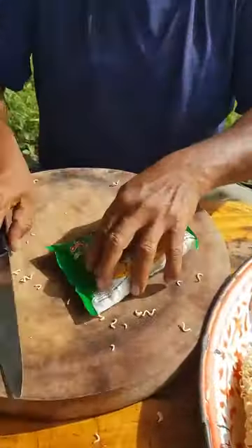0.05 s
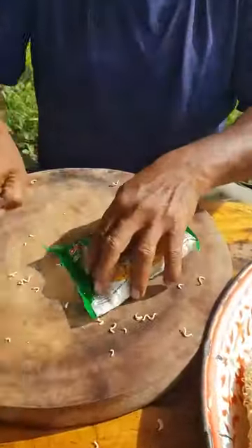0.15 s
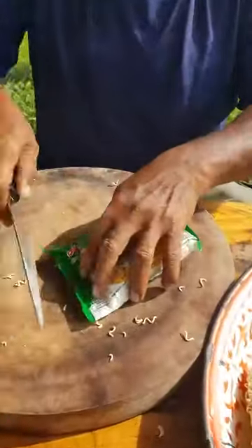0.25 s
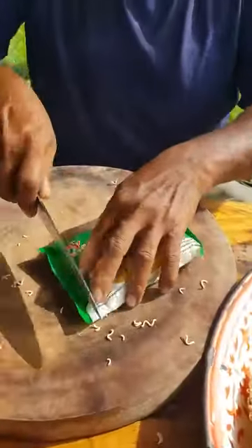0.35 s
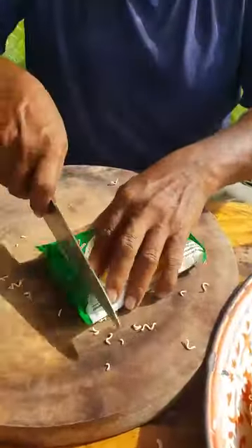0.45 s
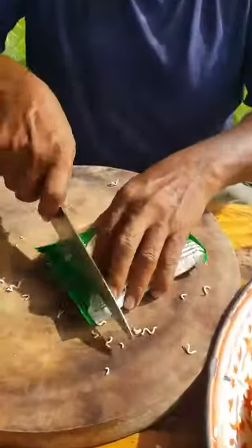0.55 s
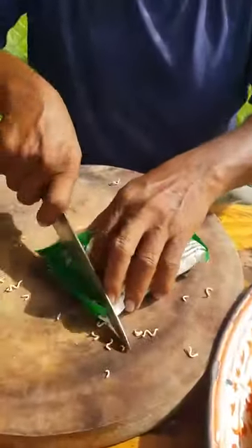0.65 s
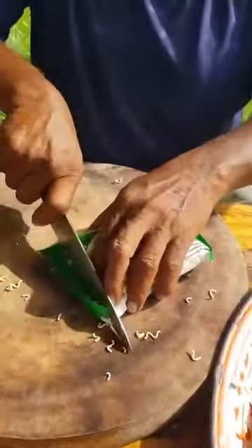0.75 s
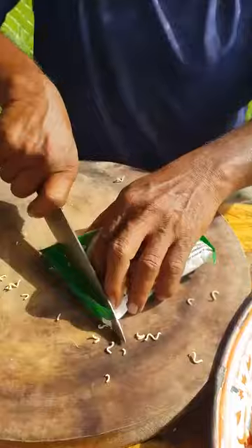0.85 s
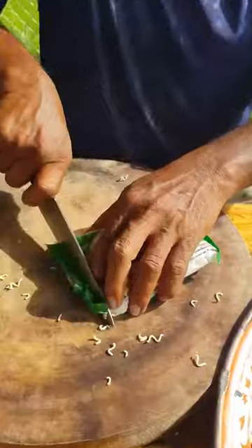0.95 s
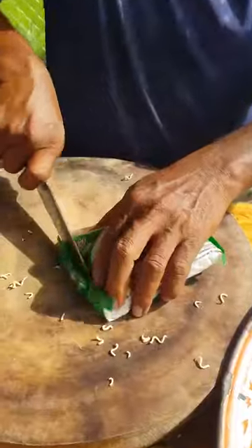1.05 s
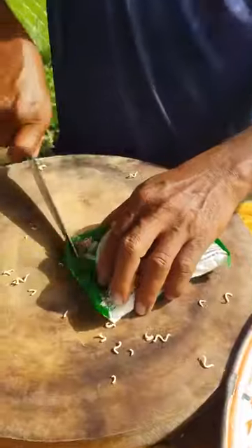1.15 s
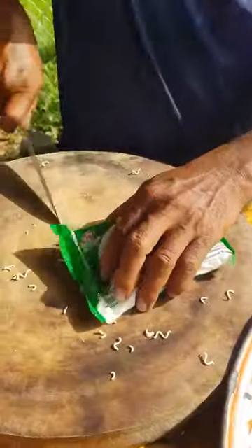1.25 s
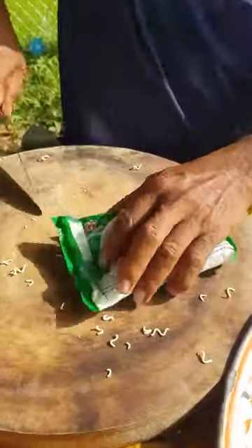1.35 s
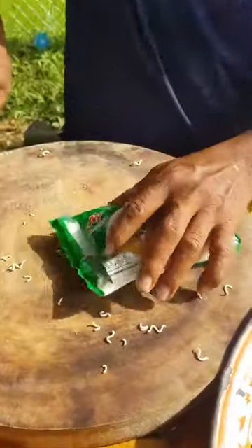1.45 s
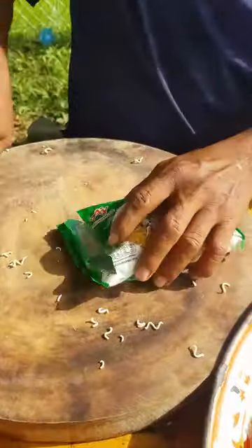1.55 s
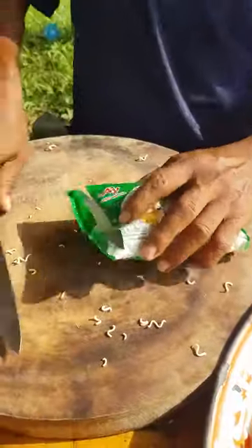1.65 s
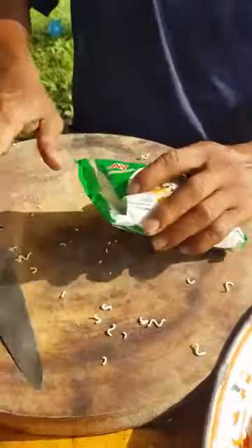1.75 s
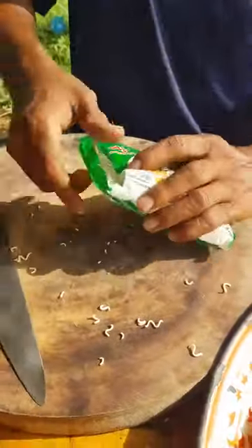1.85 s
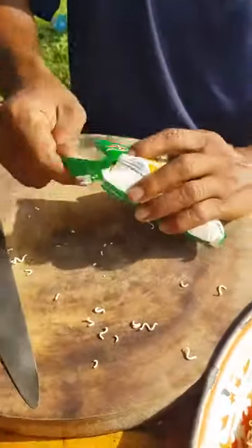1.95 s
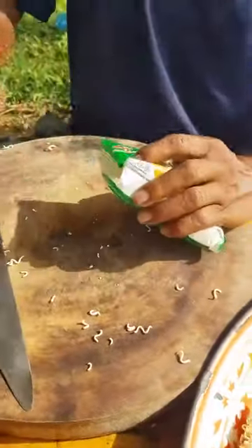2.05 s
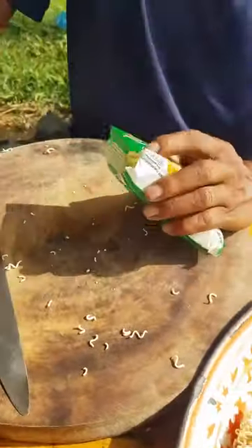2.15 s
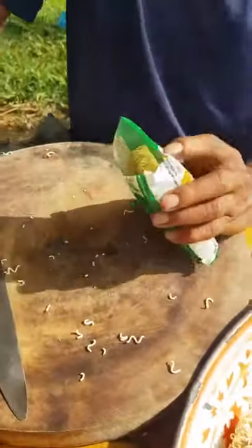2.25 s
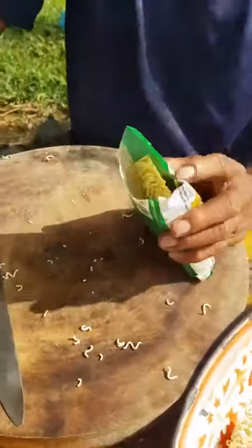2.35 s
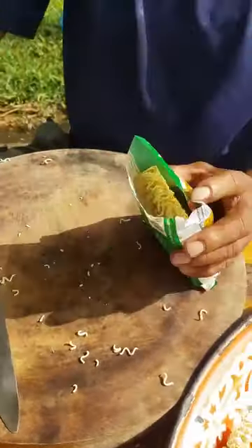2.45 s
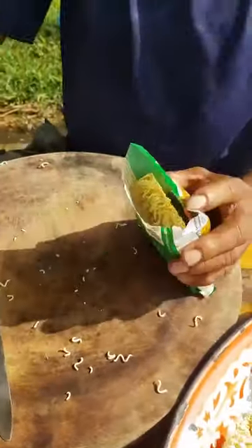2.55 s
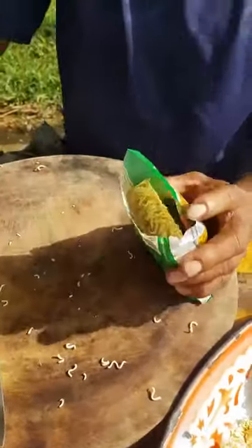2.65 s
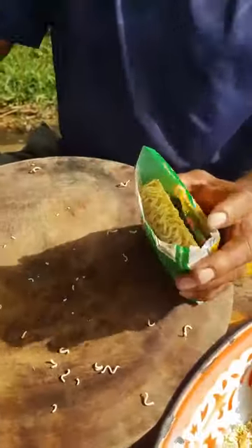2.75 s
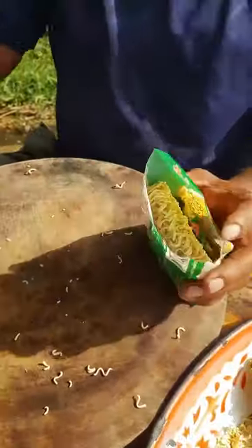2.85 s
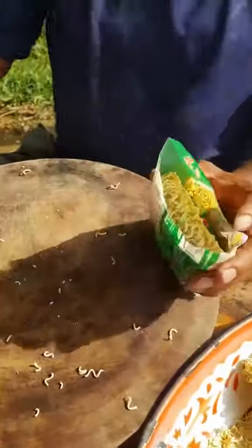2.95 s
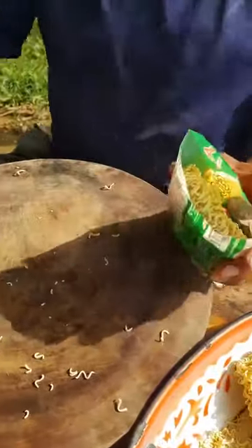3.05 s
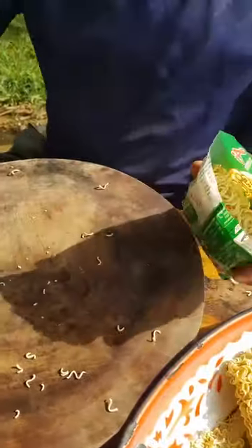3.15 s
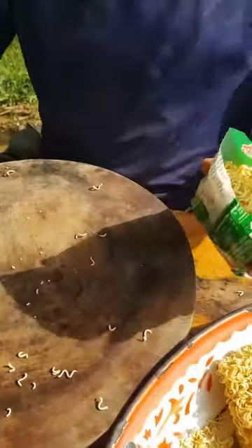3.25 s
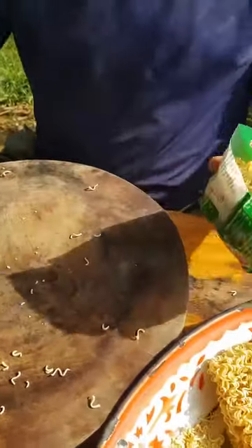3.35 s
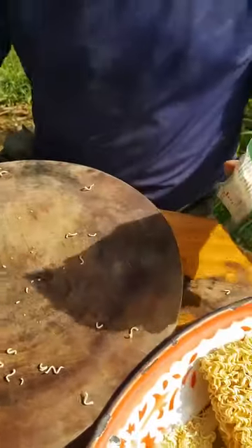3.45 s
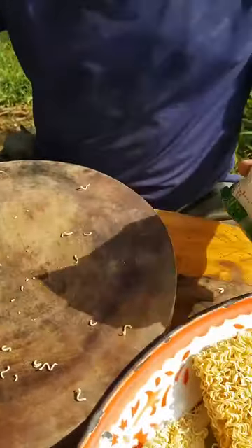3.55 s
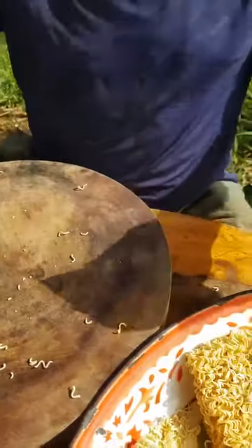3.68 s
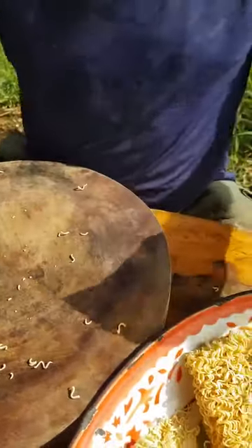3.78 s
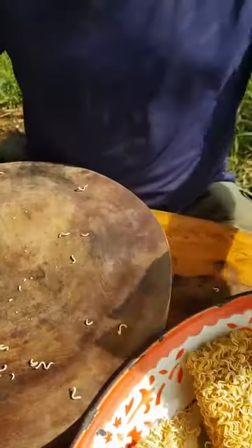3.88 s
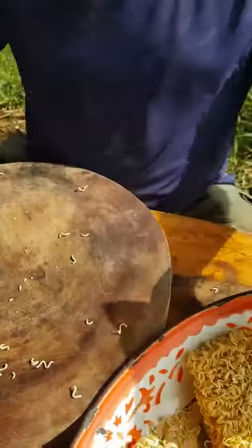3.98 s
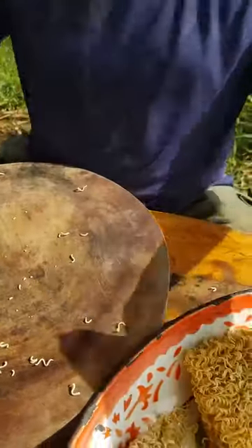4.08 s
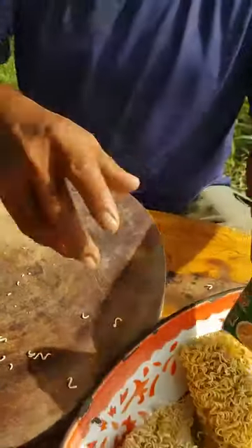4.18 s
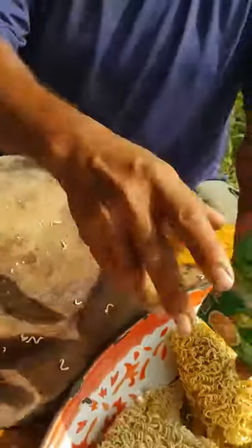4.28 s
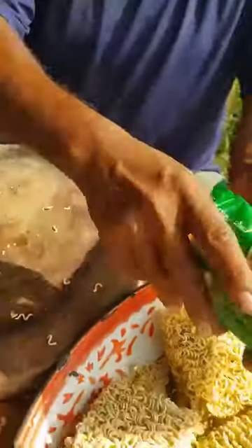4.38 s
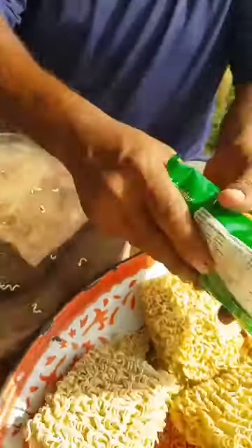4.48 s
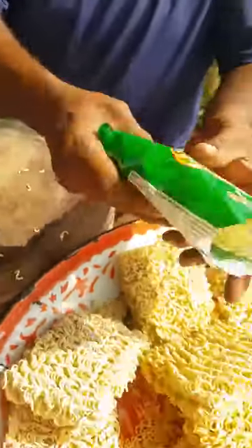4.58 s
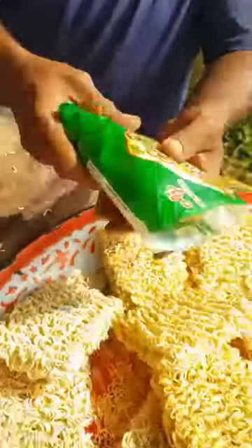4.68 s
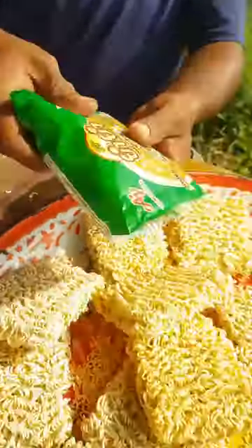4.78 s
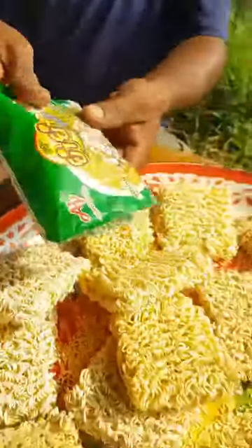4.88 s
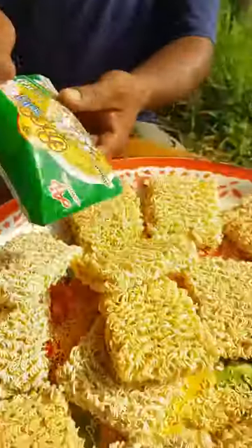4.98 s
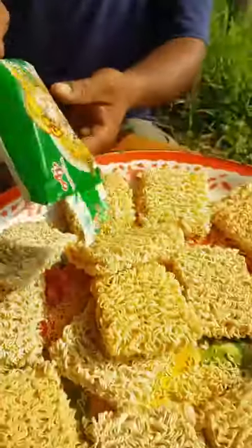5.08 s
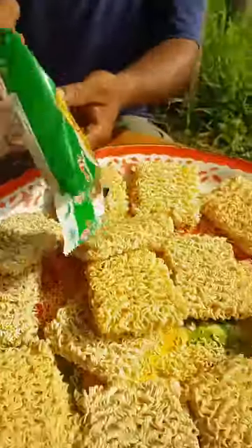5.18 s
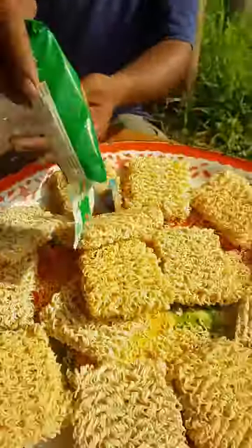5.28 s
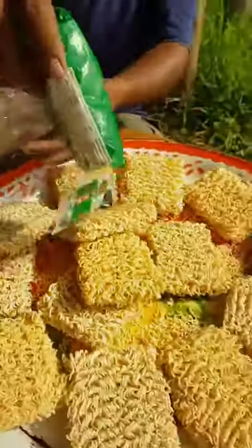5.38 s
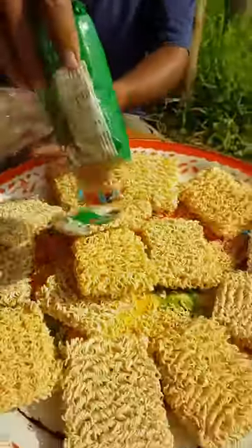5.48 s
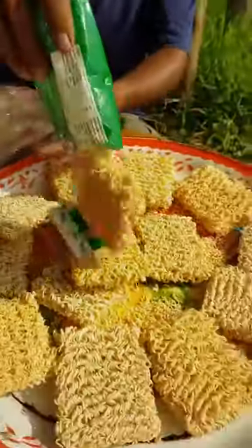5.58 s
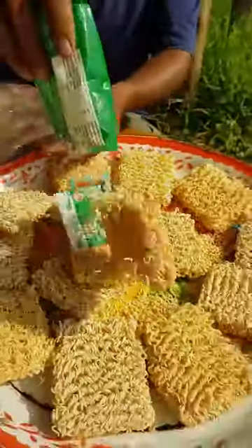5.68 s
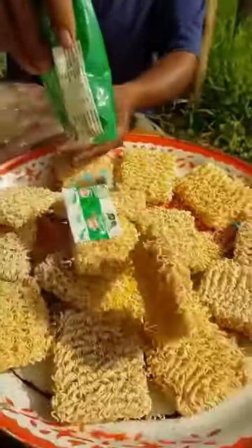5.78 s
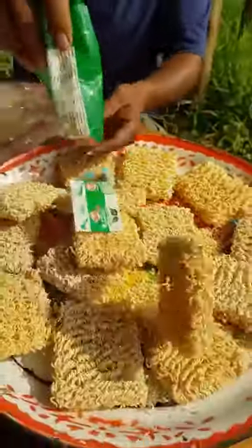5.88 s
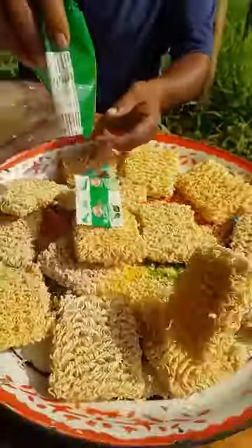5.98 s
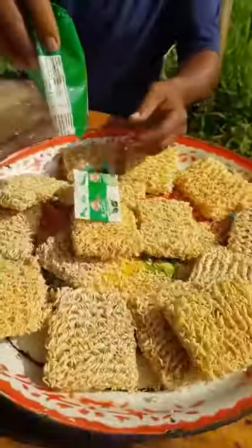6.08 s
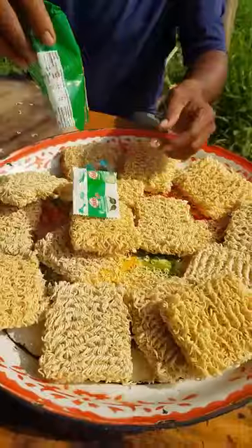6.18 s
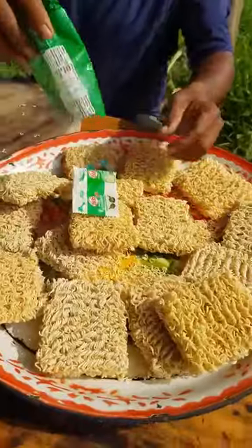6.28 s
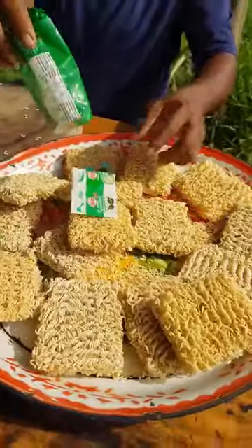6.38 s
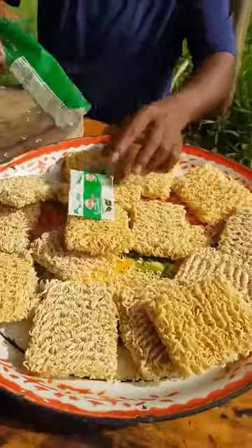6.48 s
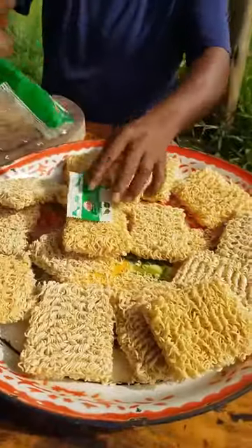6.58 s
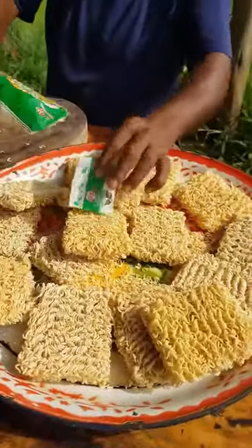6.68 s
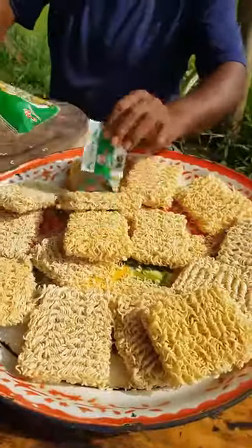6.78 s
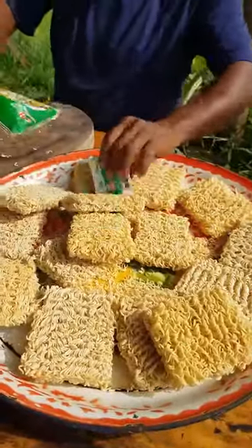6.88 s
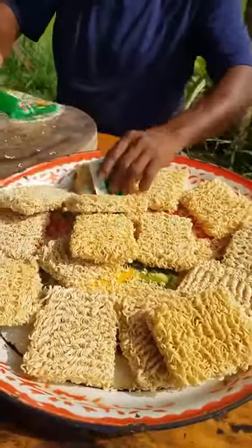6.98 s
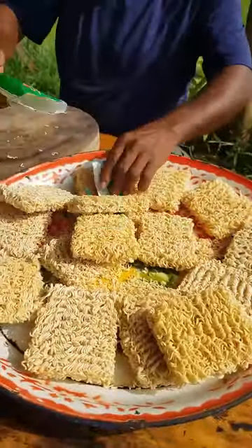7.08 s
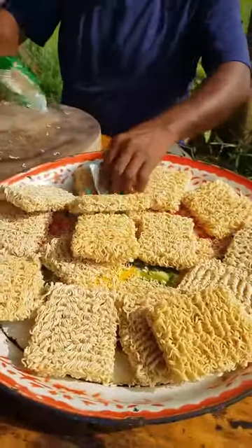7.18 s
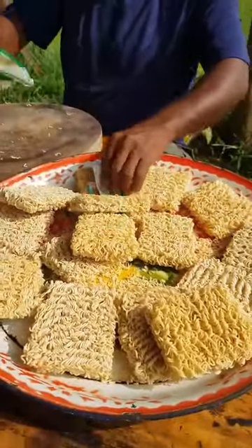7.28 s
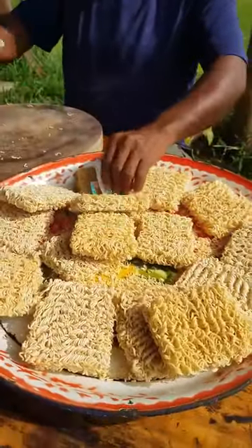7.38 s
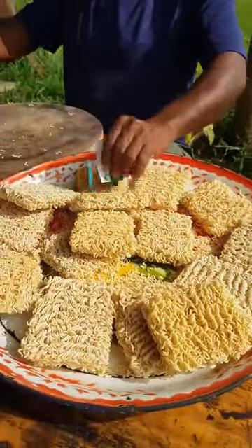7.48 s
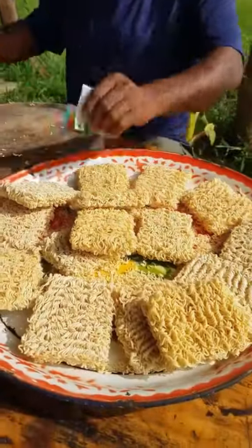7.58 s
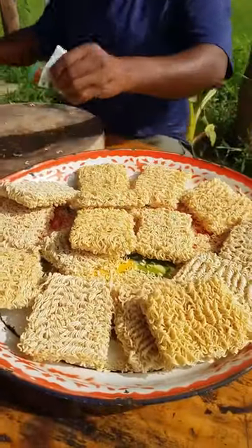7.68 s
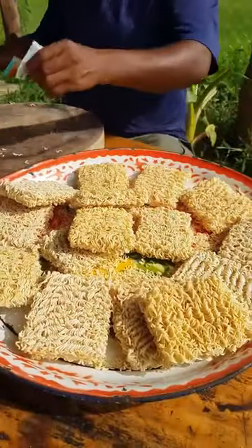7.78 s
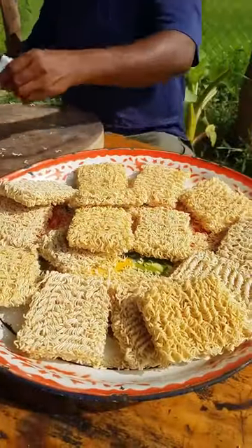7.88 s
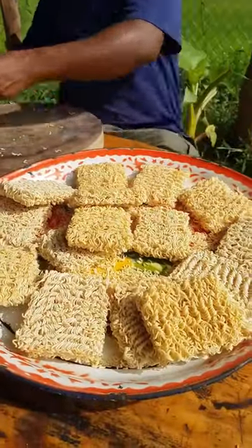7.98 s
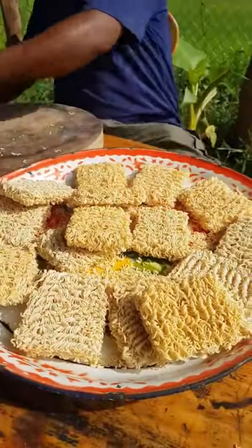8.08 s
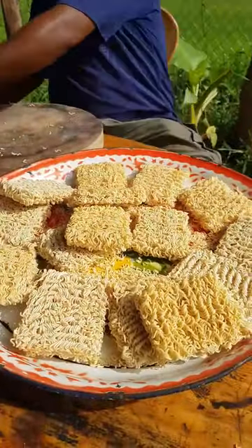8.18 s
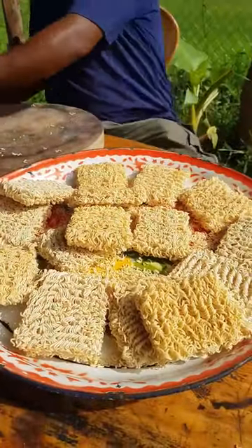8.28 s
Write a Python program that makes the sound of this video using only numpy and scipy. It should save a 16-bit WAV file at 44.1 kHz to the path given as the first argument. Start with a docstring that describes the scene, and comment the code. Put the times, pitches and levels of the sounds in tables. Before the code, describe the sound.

Outdoors, over a low rumble of wind on the microphone, hands cut and squeeze a thin plastic packet with crisp, close crinkling. A knife clatters onto a wooden block, and the plastic rips open. After a quieter stretch the crackle returns, and dry noodles land on an enamel tray with several dull bumps. Sachets rustle in short bursts near the end, with a faint distant hum behind them.

```python
"""A plastic noodle packet crackles as its creases buckle: outdoors, hands slit it on a wooden block,
drop the knife, tear it open and tip the dry noodle cake and sachets onto an enamel tray. Block, blade
and tray answer each impact with their damped modes. A low wind rumble at the two microphone ports
swells with thumps as knife and noodle cake land. One bird chirp and a faint hum come from afar, over
a soft hiss of leaves and microphone."""
import sys
import numpy as np
from scipy import signal
from scipy.fft import rfft, irfft, next_fast_len
from scipy.io import wavfile

SR = 44100
rng = np.random.default_rng(int(sys.argv[2]) if len(sys.argv) > 2 else 0)


def log_audio(samples):
    """Write samples as a 16-bit WAV file to the path given in sys.argv[1]."""
    # one column per channel
    frames = np.atleast_2d(samples).T
    # limit to full scale, then quantise
    limited = np.clip(frames, -1, 1)
    pcm = np.round(limited * 32767).astype(np.int16)
    wavfile.write(sys.argv[1], SR, pcm)


N = 367353

# Colour of the crackle. Each row: time in seconds; body (under 900 Hz), hollow (to 1.9 kHz), edge
# (3-7.6 kHz) and sheen (above), each in dB re 1.9-3 kHz; smooth rubbing in dB re the creases.
FILM_COLOUR = [(0, 0.5, -2, -2, -9.5, -2), (.7, 0.5, -2, -4.5, -14.5, -4), (1.13, 3, 0.5, 3, -4.5, 2.5),
               (1.4, 0.5, 1, -4, -14.5, 0), (2.1, 7.5, 1, 1, -4.5, 1), (2.6, -9, -4, -3, -12.5, 0.5),
               (3.4, -6, -2, 3.5, 2, 2.5), (4, -10, 4, -1, -7.5, 6.5), (4.4, -3, 5.5, -4, -12.5, -0.5),
               (5.3, 2.5, -1, 2.5, -5, 1), (5.58, -0.5, 7, 1, -4.5, 5.5), (5.9, 4, 3.5, 5, 3, 5),
               (6.3, -5, 3, 12.5, 4.5, 3), (6.9, 1.5, 1.5, -0.5, -5.5, 3),
               (7.4, -2.5, -7.5, -2.5, -7.5, -1), (7.85, -6.5, 2.5, 4.5, -1.5, 8),
               (8.33, -13.5, -2.5, 1, -2.5, -1.5)]
# Likeness of the film's noise at the two ports. Each row: frequency in Hz, correlation.
FILM_CORRELATION = [(300, 0.45), (600, 0.24), (1500, 0.46), (4000, 0.42), (12000, .1)]
CREASES_PER_S, CREASE_CYCLES, CREASE_TAIL_S = 200, 7.35, .012
SHEEN_HZ, EVEN_RUB_DB = 7600, 9
def film():
    """Buckling: creases give way in clumps, each a tick and a noise burst, over the hiss of friction."""
    *colour, rub_db = in_time(FILM_COLOUR)
    clumps = amp(3 * drift(18))
    born = np.flatnonzero(rng.random(N) < CREASES_PER_S * clumps / SR)
    size_db = 3.5 * np.minimum(rng.exponential(1, len(born)), 3.5)
    facing = rng.choice([-1, 1], N)   # a crease pops in or out
    uneven = np.clip(1 - rub_db / EVEN_RUB_DB, .3, 1)   # strong rubbing is a more even hiss
    slide = amp(rub_db + 2 * uneven * drift(7.8))
    balance = np.sqrt(2 / (1 + amp(2 * rub_db)))   # creases and rubbing share the power
    crackle = snaps = 0
    for hz, noise in bands(243.3, count=12, correlation=FILM_CORRELATION):
        t60 = CREASE_CYCLES / hz + CREASE_TAIL_S
        creases = np.full(N, 1e-18)
        tint_db = 3.5 * np.clip(rng.standard_normal(len(born)), -2, 1.5)   # each crease's own colour
        creases[born] = amp(size_db + tint_db)
        bursts = rms_one(decay(creases, t60))
        rubbing = slide * amp(4.5 * uneven * drift(12.3) + 2.5 * (hz > SHEEN_HZ))
        tick = rms_one(mode(creases * facing, hz, t60=6 / hz))
        ticks = amp(-5) * np.std(noise) * np.array([tick, np.roll(tick, rng.integers(-3, 4))])
        crackle += amp(film_db(hz, *colour)) * balance * ((bursts + rubbing) * noise + ticks)
        snaps += snap_envelope(hz, t60) * noise / np.std(noise)
    ringing = amp(-4 - np.maximum(rub_db, 0)) * pings(clumps, colour)
    return handling() * (rms_one(crackle) + ringing) + snaps + snap_clicks()


# Spectrum of the film. Each row: frequency in Hz, relative spectral density in dB.
FILM_SPECTRUM = [(180, -37.5), (300, -14.5), (348, -3.5), (645, -0.5), (814, -5.5), (1230, -4.5),
                 (2140, -0.5), (3700, -4.5), (4830, -3), (7320, -8.5), (10400, 1), (13100, -5.5),
                 (16000, -32.5)]
def film_db(hz, body_db, hollow_db, edge_db, sheen_db):
    """Spectral shaping: the film's level at one frequency, tinted by the colour of the moment."""
    region = np.searchsorted([900, 1900, 3000, SHEEN_HZ], hz, side="right")
    return at_hz(FILM_SPECTRUM, hz) + (body_db, hollow_db, 0, edge_db, sheen_db)[region]


# Squeezes, cuts and pulls. Each row: start in seconds, length in seconds, opening level in dB,
# swell over the length in dB.
FILM_SQUEEZES = [(0, 0.2, -36.5, -4.5), (0.202, 0.067, -48, 3), (0.363, 0.082, -47.5, 14),
                 (0.513, 0.087, -44.5, 12), (0.638, 0.12, -37.5, -2.5), (0.821, 0.071, -36.5, -2.5),
                 (0.9, 0.044, -43, -10), (0.955, 0.21, -35, 5.5), (1.143, .13, -36, 0.5),
                 (1.33, 0.14, -39.5, 6.5), (1.542, 0.059, -50, 24), (1.646, 0.053, -41, -0.5),
                 (1.75, 0.054, -30, -12.5), (1.878, 0.041, -37.5, -10.5), (1.975, 0.075, -37.5, 1.5),
                 (2.094, 0.22, -53.5, 0), (2.349, 0.099, -48.5, -4.5), (2.471, 0.097, -46.5, -13.5),
                 (2.758, 0.045, -52, -1.5), (2.835, 0.16, -56.5, -7.5), (3.386, 0.05, -60.5, 10),
                 (3.858, 0.13, -55.5, 4.5), (4.022, 0.37, -47.5, -2.5), (4.436, 0.2, -35.5, -4.5),
                 (4.624, .15, -52.5, 12.5), (4.82, 0.037, -44.5, -0.5), (4.904, 0.075, -37.5, -12),
                 (5.022, 0.11, -42.5, -1.5), (5.177, 0.05, -39.5, -1.5), (5.273, 0.098, -52, 8.5),
                 (5.444, 0.18, -41.5, 5), (5.69, 0.06, -40, -5), (5.767, 0.15, -39, -1.5),
                 (5.95, 0.16, -42.5, -9), (6.147, 0.062, -39.5, -19), (6.22, 0.15, -55.5, -15),
                 (6.682, 0.13, -52, -1.5), (6.946, 0.075, -36.5, -1), (7.052, 0.011, -45, 3.5),
                 (7.101, 0.11, -43.5, 2.5), (7.251, 0.018, -45, -27), (7.3, 0.024, -42, 2),
                 (7.398, 0.088, -40.5, -4), (7.492, 0.067, -49.5, 1.5), (7.657, 0.043, -54, -2),
                 (7.83, 0.06, -51, -2), (8.288, 0.078, -46, -8)]
# Faint crackle of film merely held. Each row: time in seconds, level in dB.
FILM_HELD = [(0, -55.5), (1.2, -41), (1.9, -62), (2.6, -63.5), (3.15, -79), (3.8, -67.5), (4.5, -60.5),
             (5.7, -48), (6.3, -68.5), (6.85, -62.5), (7.3, -46), (7.75, -68.5), (8.33, -60)]
ATTACK_DB_PER_S, RELEASE_DB_PER_S = 895, 505.5
def handling():
    """Incoherent sounds add in power: the squeezes and the held film sum to the crackle's envelope."""
    t, (held_db,) = np.arange(N) / SR, in_time(FILM_HELD)
    power = amp(2 * held_db)
    for start, length, start_db, swell_db in FILM_SQUEEZES:
        attack_db = np.minimum(0, ATTACK_DB_PER_S * (t - start))
        edges_db = attack_db - np.maximum(0, RELEASE_DB_PER_S * (t - start - length))
        near = edges_db > -50
        progress = np.clip((t[near] - start) / length, 0, 1)
        power[near] += amp(2 * (start_db + swell_db * progress + edges_db[near]))
    return np.sqrt(power)


# Single creases that snap. Each row: time in seconds, peak level in dB, centre frequency in Hz,
# sheen in dB re the peak.
CREASE_SNAPS = [(0.0528, -30, 3190, -3), (0.0836, -16, 2700, -22), (0.201, -35, 1900, -12),
                (0.2454, -30.5, 930, -19), (0.267, -23, 4240, -31), (0.2854, -30, 1660, -21),
                (0.369, -28, 2900, -19), (0.39, -31, 1100, -27), (0.43, -21.5, 3800, -26),
                (0.526, -27, 2760, -37), (0.55, -29, 3800, -13), (0.5883, -18.5, 3760, -33),
                (0.596, -31, 2200, -27), (0.641, -39.5, 2230, 9), (0.77, -23.5, 1720, -14),
                (.82, -34, 1750, -11), (0.865, -24, 5200, -6), (0.895, -29, 2400, -5),
                (0.9045, -23.5, 870, -8), (0.9119, -15.5, 3280, -21), (0.94, -22.5, 4500, -11),
                (0.9669, -25.5, 1110, -10), (1.004, -21, 3160, -2), (1.0305, -19, 1970, 0),
                (1.134, -14, 4740, -17), (1.164, -18, 930, -30), (1.2493, -13.5, 2080, -12.5),
                (1.3946, -14.5, 3300, -19), (1.453, -21, 2130, -31), (1.5213, -27.5, 2570, -13),
                (1.5462, -25, 2030, -31), (1.5612, -23.5, 2600, -26), (1.874, -25.5, 1210, -3),
                (2.012, -22.5, 1090, -9), (2.0606, -40, 2410, 7), (2.102, -27.5, 2840, -19),
                (2.163, -38, 4180, -29), (2.271, -28, 2150, -16), (2.443, -40.5, 1130, -7),
                (2.485, -33, 2750, -18), (2.685, -41, 5200, -12), (2.785, -35.5, 2714, -26),
                (3.061, -43.5, 5040, -16), (3.4351, -52, 2203, -6), (3.7684, -42, 5400, -0.5),
                (4.148, -28.5, 1730, -21), (4.2523, -46, 1480, -24), (4.3078, -29.5, 1630, -15),
                (4.364, -30.5, 1400, -20), (4.423, -23, 1450, -11.5), (4.456, -28, 1540, -31),
                (4.4778, -24, 1350, -8), (4.514, -26, 1710, -12), (4.555, -24.5, 1610, -32),
                (4.6172, -32, 1450, -3), (4.652, -26.5, 2160, -16), (4.734, -40, 1530, 7.5),
                (4.82, -36, 2470, -1), (4.9141, -26, 2570, -6), (5.021, -24.5, 1490, -31),
                (5.082, -28.5, 2280, -5), (5.171, -29, 5000, 1), (5.2032, -22.5, 5560, -4),
                (5.2724, -25, 4800, -6.5), (5.3159, -32.5, 1150, -26), (5.345, -27.5, 3250, -9),
                (5.684, -26.5, 2300, -1), (5.84, -25.5, 4190, -4), (6.1397, -19.5, 3430, -12),
                (6.2203, -28.5, 1750, -8), (6.334, -35.5, 4510, -13), (6.515, -35, 4900, -6),
                (6.684, -36, 2720, -1), (6.7954, -34, 2510, -3), (6.822, -35.5, 2330, -31),
                (6.9128, -29.5, 3160, -9.5), (6.967, -33, 4770, -19), (7.255, -21, 5950, -12),
                (7.293, -29, 2320, -29), (7.305, -23, 2260, -22), (7.4541, -23, 4200, -12),
                (7.48, -27, 3150, -16), (7.556, -40.5, 3350, 3.5), (7.618, -37, 4064, -9),
                (8.2787, -33.5, 1910, -17.5)]
SNAP_LEAD_S, SNAP_CYCLES, SNAP_RING_CYCLES = .0018, 5, 26
def snap_envelope(hz, t60):
    """Snap-through: a crease creaks, then gives way, and its noise in one band dies exponentially."""
    s, peak_db, centre_hz, sheen_db = np.transpose(CREASE_SNAPS)
    colour_db = sheen_db + 10 if hz > SHEEN_HZ else -6 * np.abs(np.log2(hz / centre_hz))
    impulses = np.full(N, 1e-18)
    impulses[np.round(s * SR).astype(int)] = amp(peak_db + colour_db - 15.5)
    impulses[np.round((s - SNAP_LEAD_S) * SR).astype(int)] = amp(peak_db + colour_db - 19)
    return decay(impulses, t60)


def snap_clicks():
    """Free vibration: a snapped panel clicks for a few cycles, then rings on faintly at the same pitch."""
    out, t = np.zeros((2, N + 1400)), np.arange(1300) / SR
    lags = rng.integers(0, 5, (len(CREASE_SNAPS), 2))   # samples of travel to each port
    for (s, peak_db, hz, _), lag in zip(CREASE_SNAPS, lags):
        dying = amp(-60 * t * hz / SNAP_CYCLES) + amp(-10 - 60 * t * hz / SNAP_RING_CYCLES)
        click = amp(peak_db - 2) * dying * np.sin(2 * np.pi * hz * t)
        for port in range(2):
            at = round(s * SR) + lag[port]
            out[port, at:at + len(t)] += click
    return out[:, :N]


PINGS_PER_S, PING_CYCLES, PATCHES = 200, 30, 30
def pings(clumps, colour):
    """Membrane resonance: taut patches of film ring briefly, each at its own pitch and place."""
    born = np.flatnonzero(rng.random(N) < PINGS_PER_S * clumps / SR)
    sizes = amp(3.2 * np.minimum(rng.exponential(1, len(born)), 3)) * rng.choice([-1, 1], len(born))
    patch, out = rng.integers(0, PATCHES, len(born)), np.zeros((2, N))
    for k, hz in enumerate(np.geomspace(700, 7000, PATCHES) * rng.uniform(.96, 1.04, PATCHES)):
        clicks = np.zeros(N)
        clicks[born[patch == k]] = sizes[patch == k]
        ring = rms_one(mode(clicks, hz, PING_CYCLES / hz)) * amp(film_db(hz, *colour)) * np.sqrt(hz)
        out += [ring, np.roll(ring, rng.integers(-6, 7))]
    return rms_one(out)


# The knife lands and bounces. Each row: time in seconds, contact level in dB, then the ring of the
# block and of the blade in dB re the contact.
KNIFE_IMPACTS = [(1.584, -38, 0, 14), (1.595, -2.5, -3, -15), (1.657, -32, 17, -8), (1.734, -10.5, 2, -14),
                 (1.748, -29, 6, 7), (1.76, -32, 12, 15), (1.795, -41, 19, 9), (1.838, -38, 13, 0),
                 (1.871, -40, 12, 12), (1.881, -40, 14, 23), (1.899, -45, 19, 21)]
# Modes of the wooden block and of the blade. Each row: frequency in Hz, level in dB, t60 in seconds.
BLOCK_MODES = [(158, -18, .13), (262, -21, .09), (450, -23, .06), (581, -13, .075), (1110, -9, .024),
               (1385, -4.5, .014), (1940, -1, .015), (2260, -4, .018), (2735, -12, .035), (3350, -16, .012)]
BLADE_MODES = [(3655, -20, .08), (4800, -23, .11), (5790, -19, .07), (6770, -21, .06), (8436, -27, .06),
               (9938, -21, .45), (11100, -26, .11)]
# Spans in which the blade rings freely in the air. Each row: start and end in seconds.
BLADE_AIRBORNE = [(1.575, 1.654), (1.73, 1.832), (1.868, 1.92)]
CONTACT_CUT_HZ, BLADE_DAMP_DB_PER_S = 4200, 700
def knife():
    """Impact excitation: block and blade ring at each bounce; contact damps the blade as it lies."""
    s, contact_db, block_db, blade_db = np.transpose(KNIFE_IMPACTS)
    rings_on = np.transpose(BLOCK_MODES)[2] > .025   # the shorter modes are the contact itself
    block = struck(s, contact_db[:, None] + block_db[:, None] * rings_on, BLOCK_MODES, scatter_db=1.5)
    dulling = signal.butter(2, CONTACT_CUT_HZ, fs=SR, output="sos")   # wood yields to the blow
    blow_db = np.outer(contact_db + blade_db, np.ones(len(BLADE_MODES)))
    blade = struck(s, blow_db, BLADE_MODES, scatter_db=2.5)
    t = np.arange(N) / SR
    since_landing = [np.where(t < start, 1, np.maximum(0, t - end)) for start, end in BLADE_AIRBORNE]
    damping = amp(-BLADE_DAMP_DB_PER_S * np.min(since_landing, axis=0))
    left, right = signal.sosfilt(dulling, block) + blade * damping
    return np.array([np.roll(left, 6), right])   # the block lies nearer the right port


# Cake, sachets and packet bump on tray or block. Each row: time in seconds, level in dB, deep thump
# in dB re that level, centre frequency in Hz.
SOFT_IMPACTS = [(0.281, -26.5, -6, 560), (0.767, -25, -5, 550), (0.821, -27.5, -28, 526),
                (1.158, -29, -33, 700), (1.227, -23, 5, 393), (1.39, -31.5, 5, 500),
                (2.217, -31.5, -17, 450), (2.271, -26, -24, 800), (2.285, -33, -21, 600),
                (3.4, -30.5, -20, 370), (4.305, -28, -13, 450), (4.456, -25.5, -1, 450),
                (5.67, -23, 5.5, 350), (5.69, -14.5, -8, 536), (5.768, -31, 10, 450),
                (5.84, -9.5, -32, 545), (5.86, -12.5, -24, 560), (5.88, -21, -22, 560),
                (6.141, -13, -8, 400), (6.159, -8, -12, 584), (6.174, -14, -5.5, 300),
                (6.194, -21, -16, 560), (6.222, -23, -12, 360), (7.008, -16, -14.5, 540),
                (7.198, -24, -1.5, 516), (7.363, -27, -25, 502.5)]
# Modes of the tray, used for every bump. Each row: frequency in Hz, level in dB, t60 in seconds.
TRAY_MODES = [(88.6, 0, 0.14), (184.7, -6, 0.1), (286, -2.5, 0.034), (370, -4.5, 0.042), (450, -1.5, 0.021),
              (520, -3.5, 0.043), (588, -4.5, 0.055), (662, -5.5, 0.015), (806, -4.5, 0.013),
              (1100, -6, 0.01), (1630, -11, 0.015)]
OFF_CENTRE_DB_PER_OCTAVE = 12
def bumps():
    """Modal response: a light, crumbly body touches down three times, milliseconds apart, ever softer."""
    s, level_db, thump_db, centre_hz = np.transpose(SOFT_IMPACTS)
    hz = np.transpose(TRAY_MODES)[0]
    off_centre_db = -OFF_CENTRE_DB_PER_OCTAVE * np.abs(np.log2(hz / centre_hz[:, None]))
    blow_db = level_db[:, None] - 8 + np.where(hz < 250, thump_db[:, None] - 1.5, off_centre_db)
    later = np.cumsum(rng.uniform(0.00212, 0.008, (len(s), 2)), axis=1)
    times = np.r_[s, s + later[:, 0], s + later[:, 1]]
    return struck(times, np.r_[blow_db, blow_db - 8, blow_db - 12], TRAY_MODES, scatter_db=5)


# Strength of the low rumble: wind, swelling with thumps as knife and noodle cake land.
# Each row: time in seconds, level in dB, left over right in dB.
RUMBLE_LEVELS = [(0, -50, 13), (.24, -41, -1), (.44, -53, 25.5), (1.1, -54, 21), (1.2, -44, 3),
                 (1.67, -38, 1), (1.9, -46, 20), (2.25, -49.5, 20), (3.05, -47.5, 2.5), (3.6, -50, 0),
                 (4.3, -41, 3.5), (5.2, -47.5, 6), (5.55, -54, 15.5), (5.72, -31.5, 5.5), (5.95, -41, 2),
                 (6.22, -41, 6), (6.45, -48.5, 14), (6.85, -45, 0), (8.33, -46.5, 0.5)]
# Spectrum of the rumble. Each row: frequency in Hz, relative spectral density in dB.
RUMBLE_SPECTRUM = [(20, -33.5), (49, 4.5), (128, 1.5), (295, -23.5), (358, -17.5), (475, -26), (560, -46),
                   (910, -61), (1540, -120)]
def rumble():
    """Modulated noise: wind and landing thumps as low, lumpy noise, mostly separate in each channel."""
    level_db, pan_db = in_time(RUMBLE_LEVELS)
    lumps_db = 2.9 * np.array([drift(24), drift(23)])
    noise = sum(amp(at_hz(RUMBLE_SPECTRUM, hz) + lumps_db + 4.5 * drift(11.9)) * band
                for hz, band in bands(20, count=10, correlation=[(40, 0.063), (600, 1.0)]))
    return amp(level_db) * rms_one(noise) * amp([pan_db / 2, -pan_db / 2])


# The far hum. Each row: time in seconds, pitch in Hz, level in dB.
HUM_CURVE = [(6.4, 108.6, -77), (6.8, 110, -49), (7.5, 110.4, -46.5), (8.05, 112.7, -47),
             (8.33, 112.9, -55)]
def hum():
    """Partials: a low fundamental and a weak tone near its fourth harmonic, each wavering on its own."""
    fundamental = tone(HUM_CURVE, waver=0.032) * amp(5.1 * drift(7.6))
    fourth = amp(-24 + 2.6 * drift(1.6)) * tone(HUM_CURVE, waver=0.016, multiple=4)
    return fundamental + fourth


# The bird's call. Each row: time in seconds, pitch in Hz, level in dB.
CHIRP_CURVE = [(2.83, 4400, -93), (2.86, 4530, -66), (2.9, 4930, -68), (2.925, 5300, -70),
               (2.94, 5280, -90)]
def bird():
    """Frequency and amplitude modulation: one thin whistle glides upward as its level flutters."""
    return tone(CHIRP_CURVE, waver=0.0046) * amp(5.2 * drift(62))


# Spectrum of the background. Each row: frequency in Hz, relative spectral density in dB.
AIR_SPECTRUM = [(250, -14), (400, -19), (600, -38.5), (1000, -36.5), (6000, -35.5), (9000, -35),
                (16000, -39.5)]
AIR_DB = -62
def air():
    """Uncorrelated noise: distant leaves and microphone hiss, each port its own."""
    size = next_fast_len(N)
    hz = np.maximum(np.fft.rfftfreq(size, 1 / SR), 20)
    white = rfft(rng.standard_normal((2, size)))
    noise = irfft(white * amp(at_hz(AIR_SPECTRUM, hz)), size)[:, :N]
    return amp(AIR_DB + 0.7 * drift(6.27)) * rms_one(noise)


def tone(rows, waver, multiple=1):
    """Phase integrates frequency: a wavering sine on a pitch and level curve, silent outside it."""
    hz, db = in_time(rows)
    sounding = (np.arange(N) > rows[0][0] * SR) & (np.arange(N) < rows[-1][0] * SR)
    phase = 2 * np.pi * multiple * np.cumsum(hz * (1 + waver * drift(8.7))) / SR
    return sounding * np.sqrt(2) * amp(db) * np.sin(phase)


def struck(times, blow_db, modes, scatter_db):
    """Modal superposition: blow_db has a row per blow and a column per mode; levels scatter by port."""
    at, out = np.round(np.array(times) * SR).astype(int), np.zeros((2, N))
    scatter = scatter_db * rng.standard_normal((len(at), len(modes), 2))
    for k, (hz, level_db, t60) in enumerate(modes):
        clicks = np.zeros((2, N))
        clicks[:, at] = amp((blow_db[:, k, None] + level_db + scatter[:, k]).T)
        out += mode(clicks, hz, t60) * (-1) ** k
    return out


def mode(clicks, hz, t60):
    """Damped oscillator: a unit click sets a sine of height 1 ringing."""
    r, w = amp(-60 / (t60 * SR)), 2 * np.pi * hz / SR
    return signal.lfilter([0, np.sin(w)], [1, -2 * r * np.cos(w), r * r], clicks + 1e-18)


def decay(impulses, t60):
    """Exponential decay: each impulse falls 60 dB in t60 seconds."""
    return signal.lfilter([1], [1, -amp(-60 / (t60 * SR))], impulses)


def bands(low_hz, count, correlation):
    """Partial coherence: yields centre Hz and stereo noise mixed from mid and side, by half octaves."""
    white = rng.standard_normal((2, 2, N))
    for k in range(count):
        low, high = low_hz * 2 ** (k / 2), min(low_hz * 2 ** (k / 2 + .5), .45 * SR)
        centre = np.sqrt(low * high)
        bandpass = signal.butter(2, [low, high], "band", fs=SR, output="sos")
        mid, side = signal.sosfilt(bandpass, white[k % 2])
        alike = np.clip(at_hz(correlation, centre), -1, 1)
        yield centre, np.sqrt(1 + alike) * mid + np.sqrt(1 - alike) * side * [[1], [-1]]


def drift(rate_hz):
    """Low-passed noise: a slow random wander of rms about 1."""
    r = np.exp(-80 * np.pi * rate_hz / SR)   # one step per 40 samples
    slow = signal.lfilter([1], [1, -2 * r, r * r], rng.standard_normal(N // 40 + 2002))[2000:]
    return np.interp(np.arange(N) / 40, np.arange(len(slow)), rms_one(slow))


def in_time(rows):
    """Linear interpolation of a curve's columns at every sample."""
    s, *columns = np.transpose(rows)
    return [np.interp(np.arange(N) / SR, s, c) for c in columns]


def at_hz(points, hz):
    """Interpolation on a log frequency axis."""
    knots_hz, values = np.transpose(points)
    return np.interp(np.log(hz), np.log(knots_hz), values)


def amp(db):
    """Amplitude ratio of a dB value."""
    return 10 ** (np.asarray(db) / 20)


def rms_one(x):
    """Normalisation to rms 1."""
    return x / np.sqrt(np.mean(x ** 2) + 1e-20)


def scene():
    """Superposition: all sources add at the two ports."""
    return hum() + film() + knife() + bumps() + rumble() + air() + bird()


DIP_HZ, DIP_WIDTH_HZ, DIP_DEPTH, STOPBAND_HZ = 7540, 2000, 0.6, 16400
def record(dry):
    """Filtering and saturation: the treble has a dip, peaks are clipped and the top is cut."""
    dip_band = signal.lfilter(*signal.iirpeak(DIP_HZ, DIP_HZ / DIP_WIDTH_HZ, fs=SR), dry)
    clipped = np.clip(dry - DIP_DEPTH * dip_band, -1, 1)
    return signal.sosfilt(signal.cheby2(14, 80, STOPBAND_HZ, fs=SR, output="sos"), clipped)


dry = scene()
out = record(dry)
log_audio(out)
```